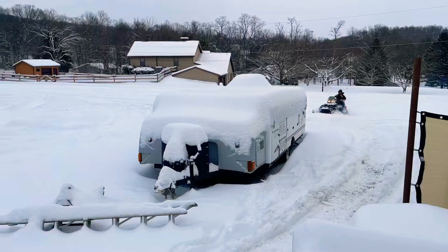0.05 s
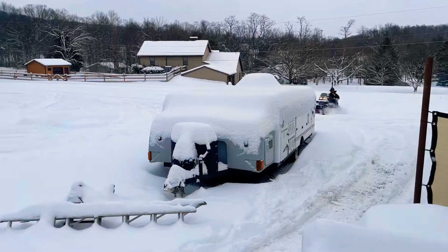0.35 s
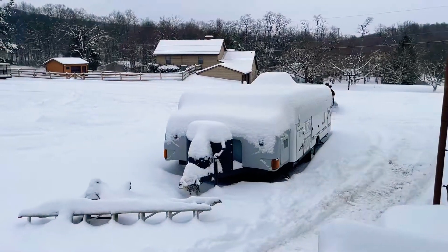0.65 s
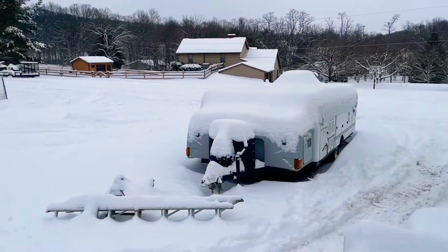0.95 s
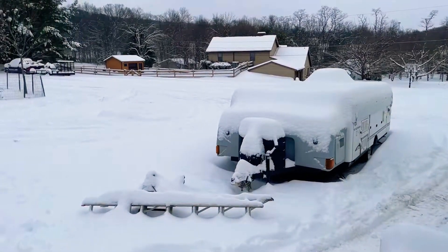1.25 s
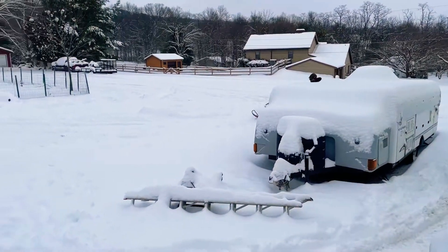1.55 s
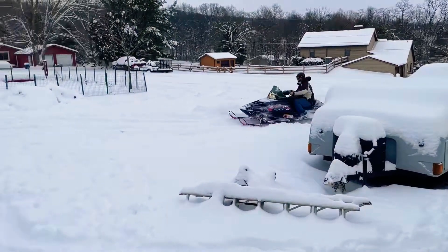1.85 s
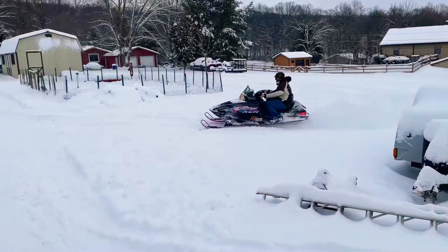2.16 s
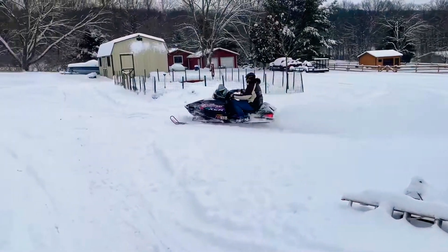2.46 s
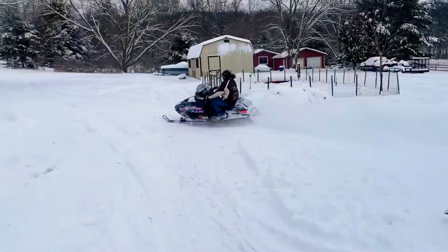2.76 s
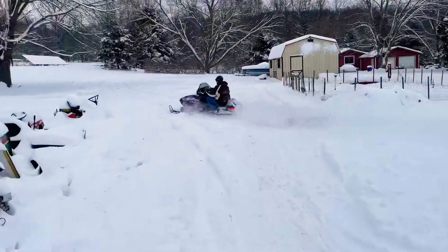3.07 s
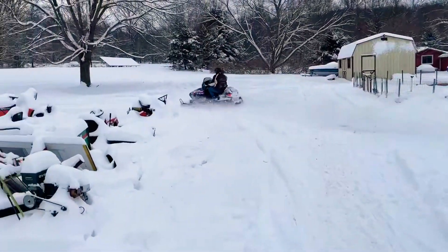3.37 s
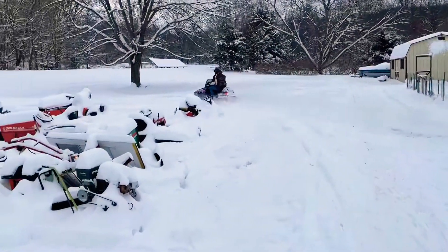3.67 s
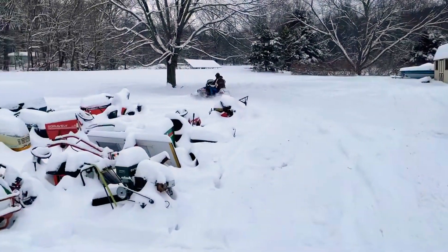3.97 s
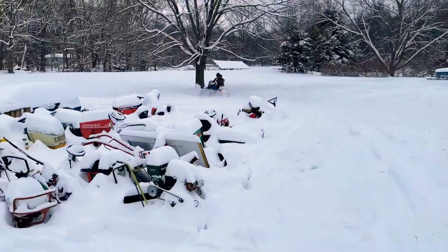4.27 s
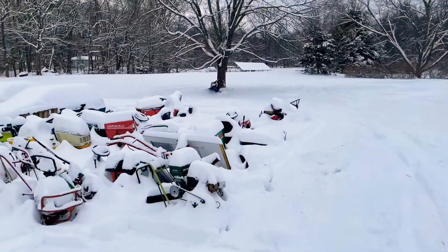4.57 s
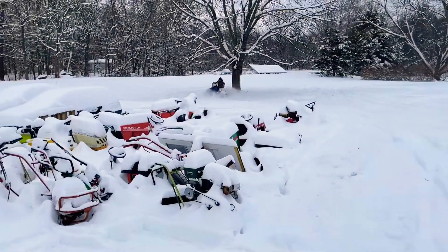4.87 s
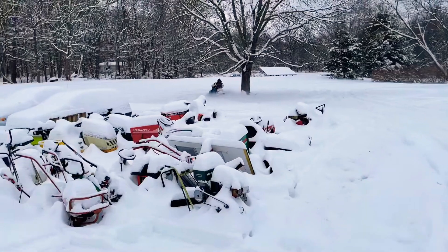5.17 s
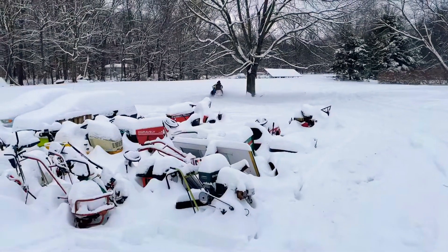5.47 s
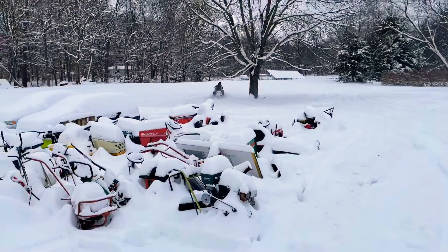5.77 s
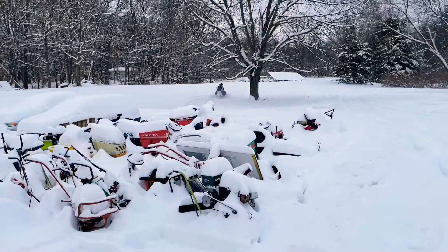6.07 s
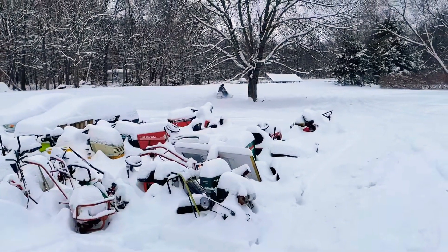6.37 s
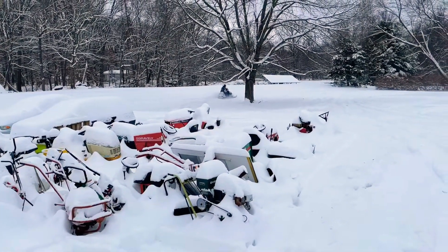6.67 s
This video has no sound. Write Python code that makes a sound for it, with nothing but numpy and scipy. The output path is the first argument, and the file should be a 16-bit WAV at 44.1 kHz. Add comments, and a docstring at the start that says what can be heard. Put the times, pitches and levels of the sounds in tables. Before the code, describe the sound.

A two-stroke snowmobile approaches across a snowy yard, its buzzing engine rising and falling in several bursts of throttle. It is loudest and raspiest as it passes, with a low track rumble and brief metallic chatter. The revs then collapse into a burble, climb once more, and sink to a faint drone with soft hisses of snow as it pulls away. Heard in stereo from one spot, with faint outdoor echoes.

```python
"""A snowy yard: a snowmobile with a three-cylinder two-stroke engine crosses in bursts of throttle,
then pulls away. Under load the exhaust sings at the firing rate, the tuned pipe barks and the hood
rasps; off the throttle it misfires and burbles, and the slack drive chatters. The track rumbles and
throws up hissing snow, and trees and buildings send back faint echoes."""
import sys
import numpy as np
from scipy import signal
from scipy.fft import rfft, irfft, next_fast_len
from scipy.io import wavfile

SR = 44100
rng = np.random.default_rng(int(sys.argv[2]) if len(sys.argv) > 2 else 0)


def dump_mix(stems):
    """Bounce the given channels to the path in sys.argv[1] as a 16-bit WAV at rate SR."""
    frames = np.atleast_2d(stems).T  # one column per channel
    limited = np.clip(frames, -1, 1)  # hard clip at full scale
    pcm = np.round(limited * 32767).astype(np.int16)
    wavfile.write(sys.argv[1], SR, pcm)


N = 296352
TIME_S = np.arange(N) / SR


def from_db(db):
    return 10 ** (np.asarray(db) / 20)


def rms_one(x):
    return x / np.sqrt(np.mean(x ** 2) + 1e-20)


def automation(points):
    """A breakpoint curve, sample by sample."""
    return np.interp(TIME_S, *np.transpose(points))


def at_hz(points, hz):
    """Read a spectrum on a log-frequency axis."""
    freq_hz, value = np.transpose(points)
    return np.interp(np.log(hz + 1e-9), np.log(freq_hz), value)


def drift(rate_hz):
    """Slow random modulation: noise through a double one-pole low-pass; rms 1."""
    pole = np.exp(-200 * np.pi * rate_hz / SR)
    slow = signal.lfilter([1], [1, -2 * pole, pole ** 2], rng.standard_normal(N // 100 + 502))[500:]
    return np.interp(np.arange(N) / 100, np.arange(len(slow)), rms_one(slow))


def resonate(x, hz, width_hz):
    """A resonance with gain 1 at its peak."""
    r = np.exp(-np.pi * width_hz / SR)
    poles = [1, -2 * r * np.cos(2 * np.pi * hz / SR), r * r]
    return signal.lfilter(np.array([1, 0, -1]) * (1 - r * r) / 2, poles, x)


def per_cycle(cycles, uneven_db):
    """A random gain, held for each cycle."""
    return from_db(uneven_db * rng.standard_normal(N))[cycles.astype(int)]


def puffs(cycles, sharpness, uneven_db):
    """A swell once a cycle, each with a strength of its own; rms 1."""
    return rms_one(per_cycle(cycles, uneven_db) * np.exp(-sharpness * np.cos(2 * np.pi * cycles)))


def swells(events, rise_s, decay_s):
    """An envelope that grows towards each peak and dies away after it."""
    return sum(from_db(db) * np.exp(-np.maximum((peak_s - TIME_S) / rise_s, (TIME_S - peak_s) / decay_s))
               for peak_s, db in events)


def bell(peak_s, half_s):
    """A bell-shaped envelope of height 1."""
    return np.exp(-np.minimum(((TIME_S - peak_s) / half_s) ** 2, 50))


# Stereo image, narrow in the bass and widest in the low treble: freq_hz, left_right_correlation
LIKENESS = [(60, 0.98), (300, 1), (600, 0.89), (2200, 0.47), (4500, 0.5), (6800, 0.94), (8000, 1),
            (10000, 1)]
def noise(spectrum):
    """Stereo noise of a given colour, rolled off past the ends of its spectrum; rms 1."""
    size = next_fast_len(N)
    hz = np.arange(size // 2 + 1) * SR / size
    mid, side = rfft(rng.standard_normal((2, size)))
    alike = at_hz(LIKENESS, hz)
    pair = np.sqrt(1 + alike) * mid + np.sqrt(1 - alike) * side * [[1], [-1]]
    low_cut = 1 - 1 / (1 + (hz / spectrum[0][0]) ** 8)
    high_cut = 1 / (1 + (hz / spectrum[-1][0]) ** 8)
    return rms_one(irfft(pair * low_cut * high_cut * from_db(at_hz(spectrum, hz)), size)[:, :N])


# Colours of the outdoor murmur and of the microphone hiss: freq_hz, density_db
AIR_MURMUR = [(20, -21.5), (35, -19), (55, 8), (100, -18)]
HISS_FLOOR = [(2300, 8.5), (4000, 11), (7000, -6), (13000, -31)]
def background():
    """A faint steady microphone hiss, beside the low outdoor murmur."""
    return from_db(-44) * noise(AIR_MURMUR) + from_db(-53) * noise(HISS_FLOOR)


# Slapback from buildings and trees: delay_s, level_db
ECHOES = [(0.046, -25), (0.122, -37.5), (0.212, -21.5)]
def yard_echoes(x, dull_hz=2500):
    """Adds a few dull echoes, arriving a little apart at the two sides."""
    dull = signal.sosfilt(signal.butter(1, dull_hz, fs=SR, output="sos"), x)
    out = x.copy()
    for delay_s, db in ECHOES:
        for side in range(2):
            lag = int((delay_s + rng.uniform(0, 0.00053)) * SR)
            out[side, lag:] += from_db(db) * dull[side, :N - lag]
    return out


# Which way the machine faces (-1 coming, 0 side on, 1 leaving): time_s, heading
HEADING = [(0, -0.94), (1.4, -0.48), (2.3, -0.19), (2.75, 0.43), (2.98, 0.2), (4.3, 1)]
# A parked trailer stands in the way: time_s, hidden_share
HIDDEN = [(.8, 0), (1.25, 1), (1.49, 1), (1.69, 0.17)]
# Range from the listener: time_s, distance_m
DISTANCE = [(0, 40.4), (1, 25.4), (1.75, 13.74), (2.77, 12.1), (3.03, 26.8), (3.85, 21.3), (4.35, 49),
            (6.72, 54)]
def route():
    """The path across the yard: front, rear and hidden shares (0-1), and distance in metres."""
    heading = automation(HEADING)
    return np.maximum(-heading, 0), np.maximum(heading, 0), automation(HIDDEN), automation(DISTANCE)


# The track's low end: freq_hz, density_db
RUMBLE = [(25, -43), (45, -24), (60, 4.5), (80, 6.5), (115, -2), (150, -5), (400, -71)]
# Its fader: base_db, speed_doubling_db, throttle_db, front_db, rear_db, hidden_db
RUMBLE_MIX = (-32, -2, -1, 2.5, -12, 3.5)
# Sprays of snow: peak_s, level_db
SPRAYS = [(.03, -27), (4.09, -34.5), (4.72, -53.5), (4.98, -47.5), (5.8, -45)]
# Their colour: freq_hz, density_db
SPRAY_COLOUR = [(1300, 6), (2700, 2), (3800, -5), (7000, -13.5), (12000, -23)]
def track(fader):
    """The track rumbles over the snow and throws it up in hissing sprays."""
    rumble = from_db(fader(RUMBLE_MIX)) * noise(RUMBLE)
    return rumble + swells(SPRAYS, rise_s=0.21, decay_s=0.1) * noise(SPRAY_COLOUR)


# Ring of the drive parts: pitch_hz, width_hz, level_db
DRIVE_MODES = [(900, 90, -4), (1030, 73, -10.5), (1490, 180, -10), (1670, 120, -13), (2106, 48, 10.5),
               (2195, 53, -7)]
# Fits of chatter: peak_s, level_db
CHATTERS = [(.15, -24.5), (1.89, -29), (2.93, -31.5), (3.07, -41.5), (3.22, -49), (3.42, -38)]
def drive_rattle(knocks_per_s=300, uneven_db=4.0, floor_db=-62.5):
    """Slack drive parts knock at random and ring briefly, flaring up in fits."""
    knocks = (rng.random(N) < knocks_per_s / SR) * rng.choice([-1, 1], N)
    rings = sum(from_db(db) * resonate(knocks * from_db(uneven_db * rng.standard_normal(N)), hz, width)
                for hz, width, db in DRIVE_MODES)
    return (from_db(floor_db) + swells(CHATTERS, rise_s=0.075, decay_s=0.079)) * rms_one(rings)


# Reflections off surfaces near the listener: delay_s, level_db
GLANCES = [(.00125, -11.5), (.0029, -8)]
def glance(x, wander_share=0.031):
    """Short reflections ripple the sound, their delays wandering as the machine moves; rms 1."""
    samples, out = np.arange(N), x.copy()
    for delay_s, db in GLANCES:
        delayed = samples - delay_s * SR * (1 + wander_share * drift(0.74))
        out += from_db(db) * np.array([np.interp(delayed, samples, side) for side in x])
    return rms_one(out)


# The machine's top end, also colouring panel buzz and clutch: freq_hz, density_db
HISS = [(2300, 13.5), (3100, 4), (3900, 2), (5000, -0.5), (7000, -0.5), (8500, -4.5), (10500, -6.5),
        (15000, -11)]
# Its fader: base_db, speed_doubling_db, throttle_db, front_db, rear_db, hidden_db
HISS_MIX = (-32.5, 7, 3.5, 9, -3, -10.5)
def engine_hiss(turns, crank_hz, load, fader, accent_db, distance_m, air_db_per_m=0.09, top_hz=8000):
    """Gas and moving parts hiss in time with the crank and buzz under load; distance dulls the top."""
    rush = noise(HISS) * puffs(turns, sharpness=0.13, uneven_db=0.7)
    rush *= puffs(3 * turns, sharpness=0.2, uneven_db=0.7)
    buzz_share = np.clip(0.76 * load ** 2, 0, 0.9)
    rush = glance(np.sqrt(1 - buzz_share) * rush + np.sqrt(buzz_share) * panel_buzz(turns, crank_hz))
    body = signal.sosfiltfilt(signal.butter(2, top_hz, fs=SR, output="sos"), rush)
    top = (rush - body) * from_db(-air_db_per_m * distance_m)
    waver_db = 2.2 * drift(0.94) + drift(2.6)
    return from_db(fader(HISS_MIX) + accent_db + waver_db) * (body + top)


def panel_buzz(turns, crank_hz, ring_s=0.012, shift_hz=3.65):
    """A sharp crack each turn rings four hood panels, now one, now another to the fore; rms 1."""
    cracks = np.maximum(1 - np.abs(turns % 1 - 0.5) * SR / crank_hz, 0)
    cracks *= per_cycle(turns, uneven_db=-0.3)
    t = np.arange(SR // 50) / SR
    colour, out = noise(HISS), 0
    weights = np.array([drift(shift_hz) for _ in range(4)])
    for k, weight in enumerate(weights / np.linalg.norm(weights, axis=0)):
        panel = colour[:, k * len(t):(k + 1) * len(t)] * np.exp(-t / ring_s)
        out = out + weight * signal.oaconvolve(np.array([cracks, cracks]), panel, axes=1)[:, :N]
    return rms_one(out)


def clutch_ticks(turns, crank_hz, engage_hz=67.1, slip_hz=5.9, ring_hz=9000, width_hz=3500):
    """Below its engaging speed the clutch gives a short bright tick once a turn."""
    ticks = per_cycle(turns, uneven_db=1.0) * np.exp(-3.2 * (turns % 1)) * noise(HISS)
    ring = resonate(resonate(ticks, ring_hz, width_hz), ring_hz, width_hz)
    disengaged = np.clip((engage_hz - crank_hz) / slip_hz, 0, 1)
    return from_db(-52) * disengaged * rms_one(ring)


def on_pipe(hz, pipe_hz=799, width_hz=24):
    """How near a frequency is to the resonance of the tuned pipe; 0-1."""
    return 1 / (1 + (2 * (hz - pipe_hz) / width_hz) ** 2)


def overtones(turns, crank_hz, spectrum, orders, flutter_rad, fade_db, pipe_db=2.5):
    """Crank orders glide through set resonances, fluttering and fading as the path changes; rms 1."""
    out, power = np.zeros((2, N)), 0
    coarse, fine = np.arange(0, N, 64), np.arange(N)
    for order, db in orders:
        hz = order * crank_hz[coarse]
        gain = from_db(at_hz(spectrum, hz) + db + pipe_db * on_pipe(hz) + fade_db * drift(3.5)[coarse])
        power = power + gain ** 2
        phase = 2 * np.pi * (order * turns + rng.random()) + flutter_rad * drift(10)
        stereo_rad = np.arccos(at_hz(LIKENESS, hz.mean())) / 2 * (-1) ** order
        out += np.interp(fine, coarse, gain) * np.sin([phase + stereo_rad, phase - stereo_rad])
    return out * np.interp(fine, coarse, np.sqrt(2 / power))


# The hood's colour from the side and from behind: freq_hz, density_db
RASP_SIDE = [(950, 1.5), (1250, 0.5), (1450, 3), (1650, 4.5), (1850, 2), (2060, 5.5), (2350, -19),
             (2620, -1), (3000, -13), (3700, -15)]
RASP_REAR = [(950, -36), (1220, -14), (1450, 3), (1700, 9.5), (1920, -4), (2300, 6.5), (2500, -3),
             (2750, -1.5), (3150, 0), (3900, -64)]
# Its fader: base_db, speed_doubling_db, throttle_db, front_db, rear_db, hidden_db
RASP_MIX = (-26.5, 9, 1.67, 2.5, -2.5, -12.5)
def hood_rasp(turns, crank_hz, load, fader, chuff, rear):
    """The hood rasps on high overtones, breathier from behind and when the firing is uneven."""
    clean = np.clip(1.08 * load ** 2 * (1 - 0.5 * rear), 0, 0.95)
    orders = [(order, 0) for order in range(12, 22)]
    tones = overtones(turns, crank_hz, RASP_SIDE, orders, flutter_rad=0.55, fade_db=4)
    breath = np.sqrt(1 - rear) * noise(RASP_SIDE) + np.sqrt(rear) * noise(RASP_REAR)
    return from_db(fader(RASP_MIX)) * (np.sqrt(clean) * tones + np.sqrt(1 - clean) * chuff * breath)


# The tuned pipe's colour: freq_hz, density_db
BARK = [(380, -21), (480, -6.5), (590, -1.5), (700, 0), (790, 3.5), (860, 3), (930, 3), (1100, -1.5),
        (1250, -5.5), (1500, 5)]
# Its overtones: crank_multiple, level_db
BARK_ORDERS = [(6, 6.5), (7, 1.5), (8, 3), (9, 2), (10, -4.5), (11, 1.5), (12, -4.5)]
# Its fader: base_db, speed_doubling_db, throttle_db, front_db, rear_db, hidden_db
BARK_MIX = (-23, 6.5, 0.5, -5.5, -7, -6)
def pipe_bark(turns, crank_hz, load, fader, chuff, on_pipe_db=1):
    """Even firing gives the pipe clean overtones; uneven firing smears them into puffs of noise."""
    clean = np.clip(1.52 * load ** 2, 0, 0.95)
    tones = overtones(turns, crank_hz, BARK, BARK_ORDERS, flutter_rad=0.41, fade_db=7)
    level_db = fader(BARK_MIX) + on_pipe_db * on_pipe(6 * crank_hz)
    return from_db(level_db) * (np.sqrt(clean) * tones + np.sqrt(1 - clean) * chuff * noise(BARK))


# A boom as the revs collapse: peak_s, level_db
BOOMS = [(3.1, -24.5)]
# Its colour: freq_hz, density_db
BOOM_COLOUR = [(85, -4), (105, 0.5), (130, -12)]
def muffler_boom():
    """The muffler booms in one soft swell of bass."""
    return swells(BOOMS, rise_s=0.18, decay_s=0.43) * noise(BOOM_COLOUR)


# The muffler's hollow body: pitch_hz, width_hz, level_db
MUFFLER = [(105, 23.3, 3), (203, 61, 3.5), (306, 47, 0.5), (379, 73, -2.5)]
# Thuds in the burble: peak_s, level_db
THUDS = [(2.65, -40), (2.755, -20.5), (2.9, -22), (2.96, -24), (3.585, -22), (3.89, -31)]
# The burble's fader: base_db, speed_doubling_db, throttle_db, front_db, rear_db, hidden_db
BURBLE_MIX = (-20.5, 2.5, -0.5, -7, -8, -0.5)
def muffler_burble(turns, burble_db, scatter=0.24, top_hz=470, trim_db=-1.7):
    """Firings of uneven strength kick the muffler's resonances, flaring into short thuds."""
    firings = np.diff(np.floor(3 * turns), prepend=0) > 0
    kicks = firings * rng.choice([-1, 1], N) * (1 + scatter * rng.standard_normal(N)) + 1e-18
    rings = sum((-1) ** k * from_db(db) * resonate(resonate(kicks, hz, 2 * width), hz, 2 * width)
                for k, (hz, width, db) in enumerate(MUFFLER))
    muffled = signal.sosfilt(signal.butter(6, top_hz, fs=SR, output="sos"), rings)
    thuds = swells(THUDS, rise_s=0.012, decay_s=0.02)
    return np.hypot(from_db(burble_db + trim_db), thuds) * rms_one(muffled)


# Overtones that leap out of the exhaust note: peak_s, half_length_s, crank_multiple, level_db
SURGES = [(0.142, 0.16, 4, -37.5), (0.332, 0.13, 9, -42), (0.347, 0.11, 11, -37.5), (.82, 0.098, 8, -31),
          (0.995, 0.14, 10, -38.5), (0.643, .13, 4, -28.5), (1, .07, 6, -34), (1.09, 0.093, 4, -30),
          (1.491, 0.05, 4, -23.5), (1.655, 0.05, 6, -29.5), (1.766, 0.042, 4, -24),
          (1.918, 0.082, 4, -24.5), (1.989, .08, 6, -26.5), (2.448, 0.046, 4, -23),
          (2.545, 0.13, 14, -27.5), (2.59, .07, 4, -28.5), (2.656, 0.12, 13, -29), (2.744, 0.11, 6, -21.5),
          (2.749, 0.084, 5, -26), (3.239, 0.081, 11, -39.5), (3.352, 0.2, 5, -31.5), (3.624, 0.062, 7, -44),
          (3.664, 0.12, 4, -31), (3.784, 0.053, 10, -37), (3.86, 0.045, 8, -37), (4.87, 0.18, 5, -40.5),
          (4.953, 0.12, 6, -41.5), (5.931, 0.33, 5, -45), (5.947, 0.31, 11, -50), (6.3, 0.071, 4, -41),
          (6.548, 0.11, 8, -46), (6.625, 0.21, 9, -44)]
def exhaust_surges(turns, flutter_rad=0.33):
    """The weight of the note shifts: one order after another swells and sinks back."""
    out, wobble = np.zeros(N), flutter_rad * drift(14)
    for peak_s, half_s, order, db in SURGES:
        phase = 2 * np.pi * (order * turns + rng.random()) + wobble
        out += from_db(db) * bell(peak_s, half_s) * np.sin(phase)
    return np.sqrt(2) * out


# Thump and firing tone faders: base_db, speed_doubling_db, throttle_db, front_db, rear_db, hidden_db
THUMP_MIX = (-29.5, -13, -4, 2, -9.5, -18)
FIRING_MIX = (-31.5, -3, 16, -1, -9, 4.5)
# Brief dips in the firing tone: centre_s, half_length_s, gain_db
TONE_DIPS = [(0.734, .04, -5), (1.418, .04, -13), (2.381, 0.03, -9), (2.588, .035, -9), (4.285, 0.22, -6.5),
             (6.27, 0.093, -11)]
# Weak orders around it: crank_multiple, against_firing_db, against_burble_db
WEAK_ORDERS = [(2, -19, -12.5), (4, -29, -7), (5, -25, -13.5)]
# What the tailpipe passes of them: freq_hz, gain_db
TAILPIPE = [(330, -1), (385, 1), (440, -0.5), (510, -5.5), (600, 2)]
def exhaust_note(turns, crank_hz, load, fader, accent_db, burble_db, overrun):
    """Three firings a turn sing over a once-a-turn thump; unequal cylinders add orders under load."""
    phase, pull = 2 * np.pi * turns, np.clip(2 * load, 0, 1)
    dips_db = sum(db * bell(centre_s, half_s) for centre_s, half_s, db in TONE_DIPS)
    firing_db = fader(FIRING_MIX) + accent_db + dips_db
    thump = np.hypot(from_db(fader(THUMP_MIX)), overrun)
    out = thump * from_db(3 * drift(24)) * np.sin(phase)
    out += from_db(firing_db + 1.54 * drift(12)) * np.sin(3 * phase)
    for order, tone_db, rough_db in WEAK_ORDERS:
        gain = pull * np.hypot(from_db(firing_db + tone_db), from_db(burble_db + rough_db))
        gain *= from_db(at_hz(TAILPIPE, order * crank_hz) + 3.5 * drift(9.2))
        out += gain * np.sin(order * phase + 2 * np.pi * rng.random())
    return np.sqrt(2) * out


# Revs (a bend over 1 comes late): start_s, low_hz, top_s, top_hz, climb_bend, fall_bend
REVS = [(-.2, 104.2, .18, 109.4, 1, .93), (.63, 96.1, 1.05, 113.1, .85, 1.31),
        (1.45, 100.3, 1.92, 131.8, 1.07, .77), (2.22, 108, 2.8, 132.5, .78, .88),
        (3.08, 78.7, 3.9, 108.5, 2.8, .43), (4.72, 62, 6.03, 84, .78, .94), (6.4, 80.2, 6.78, 89, 1, 1)]
def crank_speed():
    """Turns per second: the engine eases in an S-curve from each low to the next top and down again."""
    revs = np.array(REVS)
    times, speeds, bends = revs[:, [0, 2]].ravel(), revs[:, [1, 3]].ravel(), revs[:, 4:].ravel()
    leg = np.clip(np.searchsorted(times, TIME_S) - 1, 0, len(times) - 2)
    progress = np.clip((TIME_S - times[leg]) / np.diff(times)[leg], 0, 1) ** bends[leg]
    return speeds[leg] + np.diff(speeds)[leg] * np.sin(np.pi / 2 * progress) ** 2


# Squeezes of the throttle: open_s, shut_s, depth_share, tone_accent_db, burble_accent_db,
# hiss_accent_db, thump_db, thump_build_s
SQUEEZES = [(-.2, 0.287, 0.82, 3, -6.5, 1.5, -41, .2), (0.682, 1.012, 0.93, 1, -3.5, 1, -18, .05),
            (1.472, 1.827, 0.92, 2.5, -7.5, 1.6, -17, 0.2), (2.099, 2.742, 0.81, 3, -4, 0.5, -28.5, .15),
            (3.166, 3.45, 0.16, 3, 2, -0.5, -34, .1), (3.426, 3.792, 1, 1.5, -3, 2.5, -25, 0.555),
            (4.638, 6.37, 0.18, 4.5, 6.5, 2, -40, .1), (5.557, 6.02, 0.85, 1, -0.5, 0.5, -54, .1),
            (6.397, 6.799, 0.88, 5.5, 0, 0.5, -41, .1)]
def rider(opening_s=0.17, shutting_s=0.19, thump_fade_db_per_s=12.5):
    """Each squeeze opens, holds and shuts the throttle, colours the engine and leaves it thumping."""
    throttle, overrun, accents_db = np.zeros(N), np.zeros(N), np.zeros((3, N))
    for open_s, shut_s, depth, *accent_db, thump_db, build_s in SQUEEZES:
        opening = np.clip((TIME_S - open_s) / opening_s, 0, 1)
        since_s = np.maximum(TIME_S - shut_s, 0)
        held = opening * (1 - np.minimum(since_s / shutting_s, 1))
        throttle = np.maximum(throttle, depth * held)
        accents_db += np.outer(accent_db, held)
        overrun *= 1 - min(2 * depth, 1) * opening ** 2  # opening up ducks the earlier thump
        build = np.minimum(since_s / build_s, 1) ** 2
        overrun += build * from_db(thump_db - thump_fade_db_per_s * since_s)
    return throttle, accents_db, overrun


CRUISE_HZ, REFERENCE_M = 110, 15  # crank speed and distance at which a fader's base_db holds
def even_firing(crank_hz, throttle, misfire_db=-2.5):
    """Throttle evens the firing (load, 0-1); losing speed brings misfires, which cost some gain."""
    coasting = 0.45 * crank_hz / CRUISE_HZ
    slowing_hz_per_s = np.maximum(-np.gradient(crank_hz) * SR, 0)
    load = np.clip(coasting + 0.25 * throttle - 0.003 * slowing_hz_per_s, 0, 1)
    return load, from_db(misfire_db * np.clip(1 - load / coasting, 0, 1) ** 2)


def scene():
    """One crankshaft and one throttle drive the machine across the yard, over a faint background."""
    crank_hz = crank_speed()
    turns = np.cumsum(crank_hz * (1 + 0.002 * drift(20))) / SR
    throttle, (tone_accent_db, burble_accent_db, hiss_accent_db), overrun = rider()
    load, misfire_gain = even_firing(crank_hz, throttle)
    front, rear, hidden, distance_m = route()
    nearness = REFERENCE_M / distance_m
    controls = np.array([np.ones(N), np.log2(crank_hz / CRUISE_HZ), throttle, front, rear, hidden])

    def fader(mix):
        """A layer's level in dB rides on speed, throttle, heading, cover and distance."""
        return np.array(mix) @ controls + 20 * np.log10(nearness)

    burble_db = fader(BURBLE_MIX) + burble_accent_db
    note = exhaust_note(turns, crank_hz, load, fader, tone_accent_db, burble_db, overrun * nearness)
    exhaust = note + exhaust_surges(turns) + muffler_burble(turns, burble_db) + muffler_boom()
    chuff = puffs(turns, sharpness=0.09, uneven_db=1.5)
    bark = pipe_bark(turns, crank_hz, load, fader, chuff)
    rasp = hood_rasp(turns, crank_hz, load, fader, chuff, rear)
    hiss = engine_hiss(turns, crank_hz, load, fader, hiss_accent_db, distance_m)
    engine = exhaust + misfire_gain * (bark + rasp) + hiss
    snow, bed = track(fader), background()
    return bed + yard_echoes(engine + snow + drive_rattle() + clutch_ticks(turns, crank_hz))


# Stereo tilt of the microphone ports: freq_hz, left_minus_right_db
PORT_BALANCE = [(330, -1.5), (560, 2.5), (800, -1), (1200, 4), (1800, -1.5), (3100, 2), (4700, 4),
                (6500, -0.5)]
# Phase between them: freq_hz, left_lead_rad
PORT_PHASE = [(100, .08), (1000, .5), (1500, -.3), (2600, .9), (5500, 0), (7200, -1.4), (7900, -2.9),
              (8600, -3.4), (9600, -4.7), (10800, -6.3), (12400, -6.4), (13800, -8)]
def record(dry, cutoff_hz=14000):
    """The two microphone ports differ in level and phase; the top is cut steeply."""
    size = next_fast_len(N + SR // 10)
    hz = np.arange(size // 2 + 1) * SR / size
    sides = np.array([[0.5], [-0.5]])
    ports = from_db(sides * at_hz(PORT_BALANCE, hz)) * np.exp(1j * sides * at_hz(PORT_PHASE, hz))
    heard = irfft(rfft(dry, size) * ports, size)[:, :N]
    return signal.sosfilt(signal.ellip(10, 0.2, 80, cutoff_hz, fs=SR, output="sos"), heard)


dry = scene()
out = record(dry)
dump_mix(out)
```